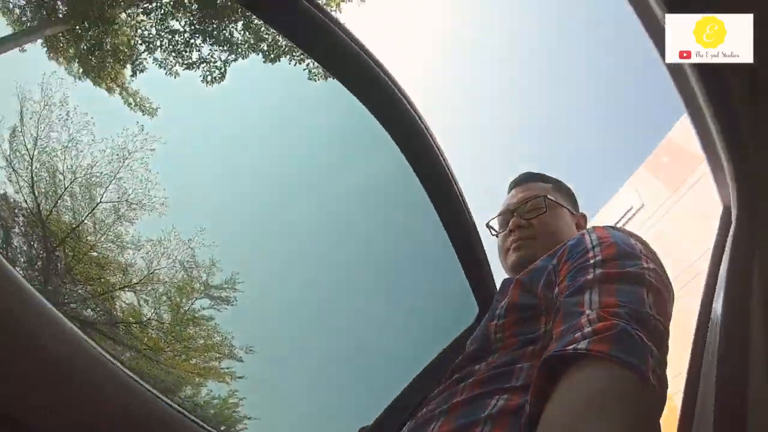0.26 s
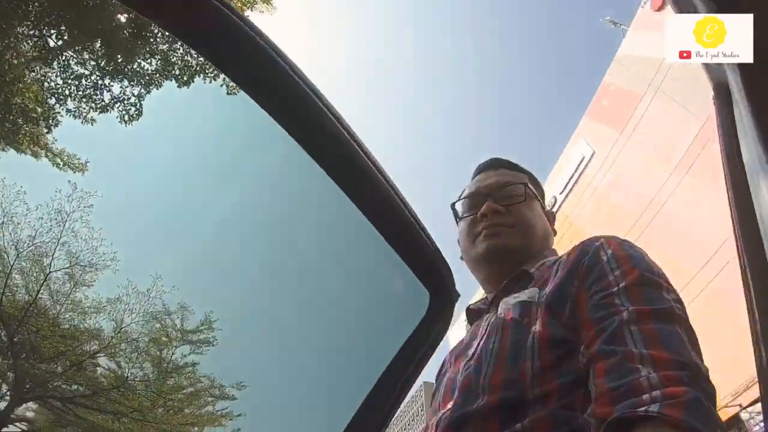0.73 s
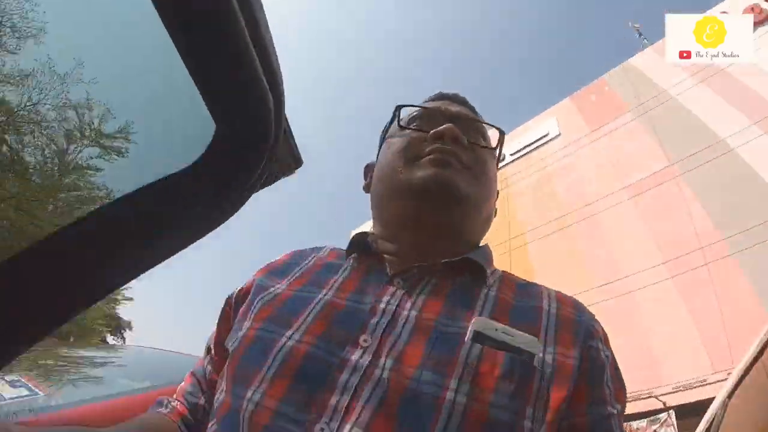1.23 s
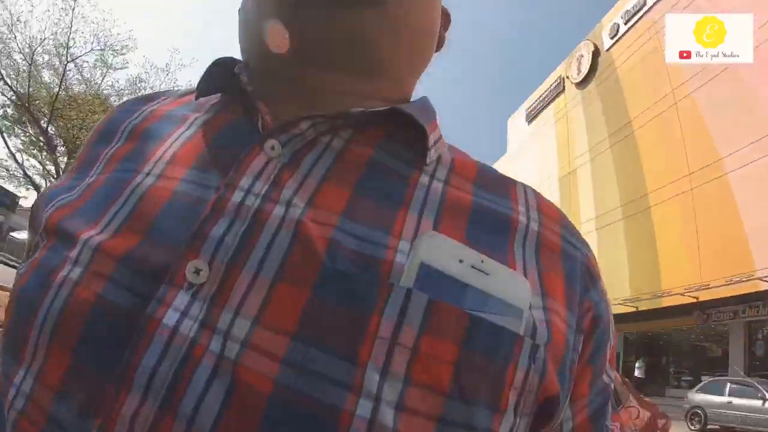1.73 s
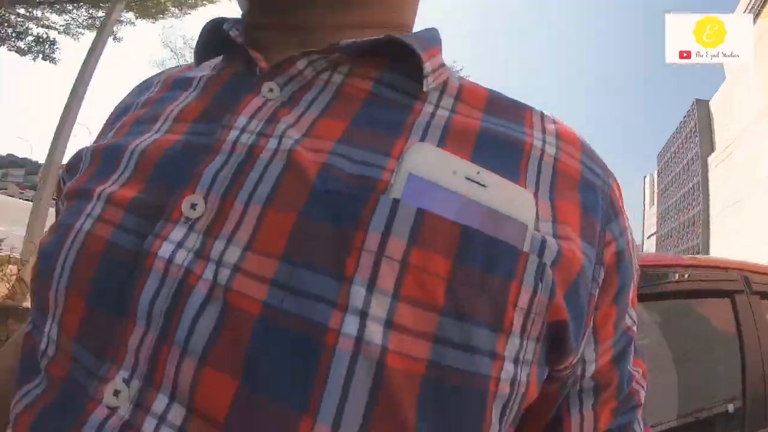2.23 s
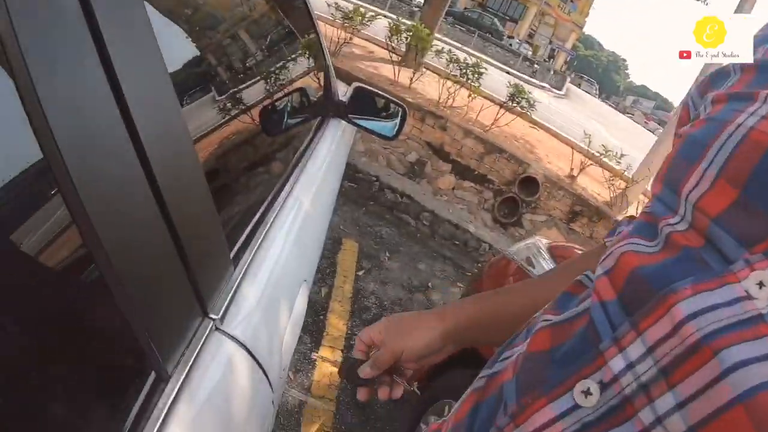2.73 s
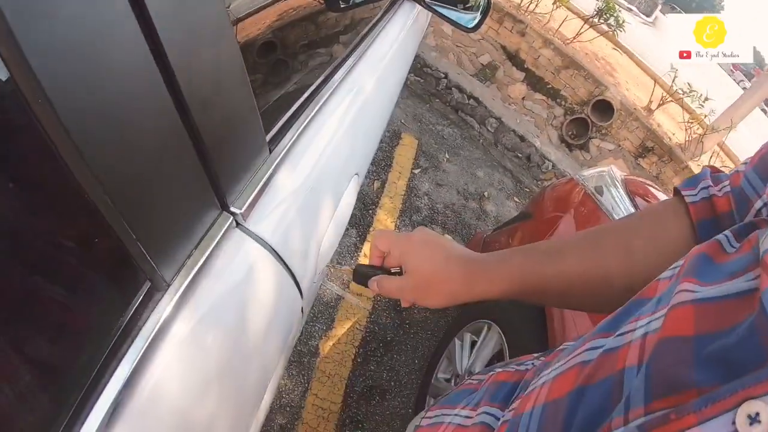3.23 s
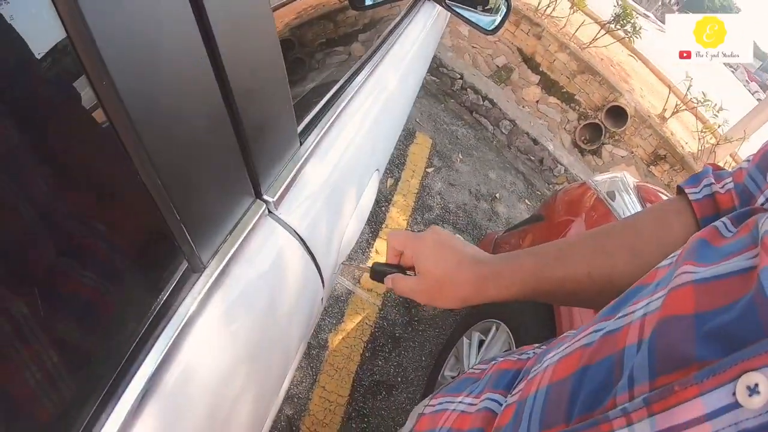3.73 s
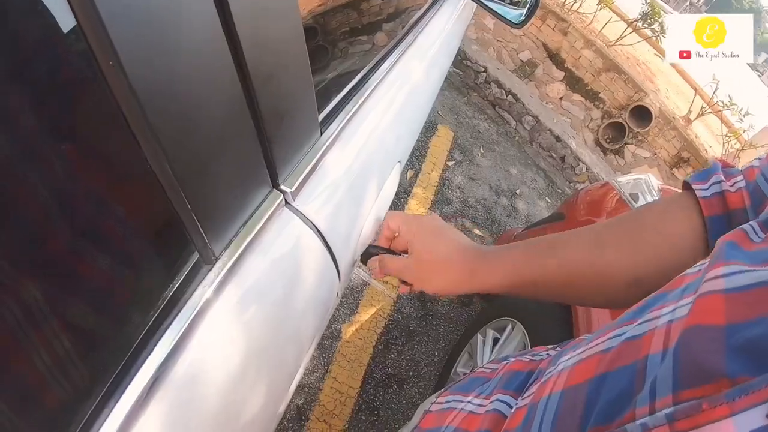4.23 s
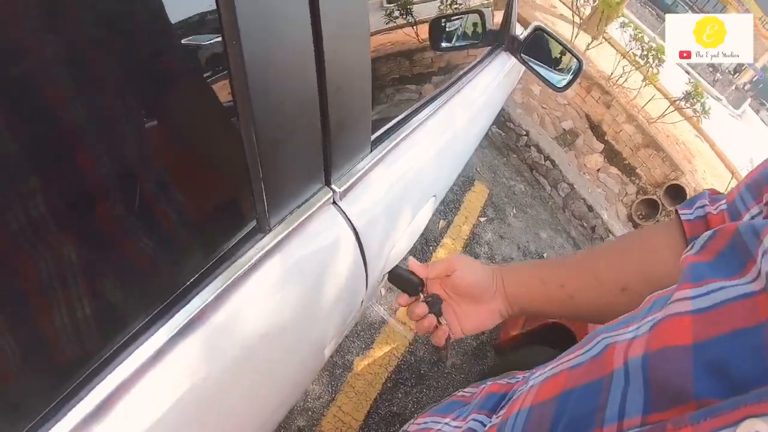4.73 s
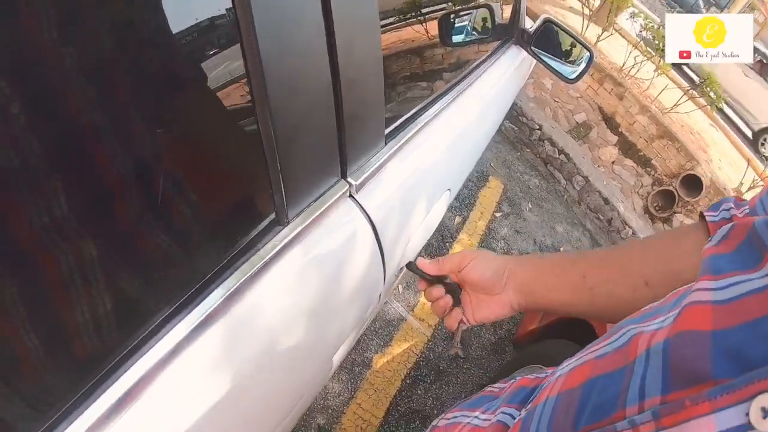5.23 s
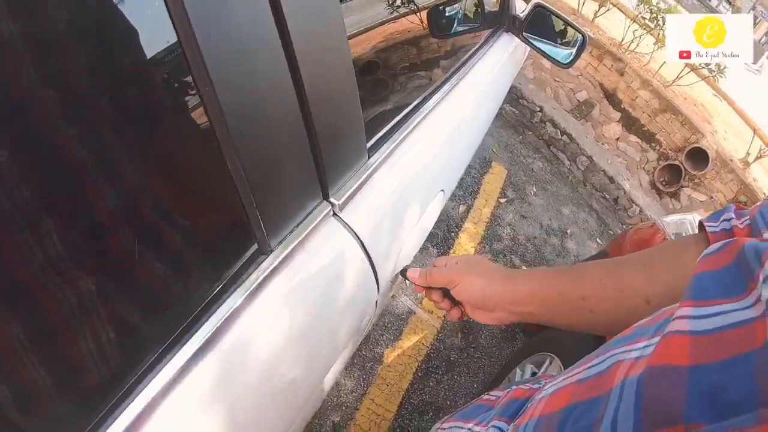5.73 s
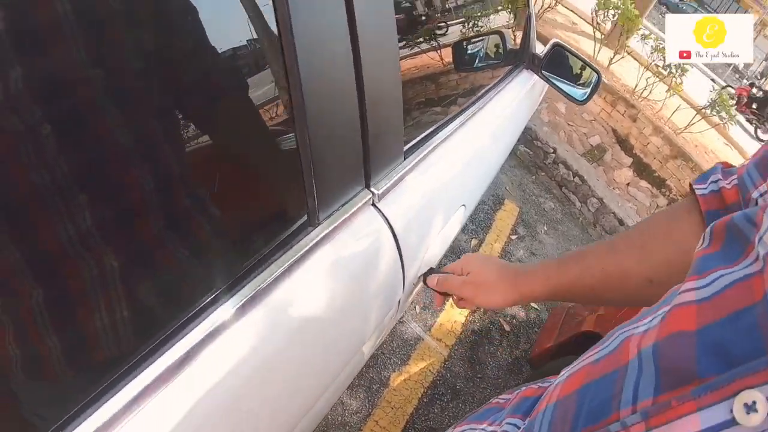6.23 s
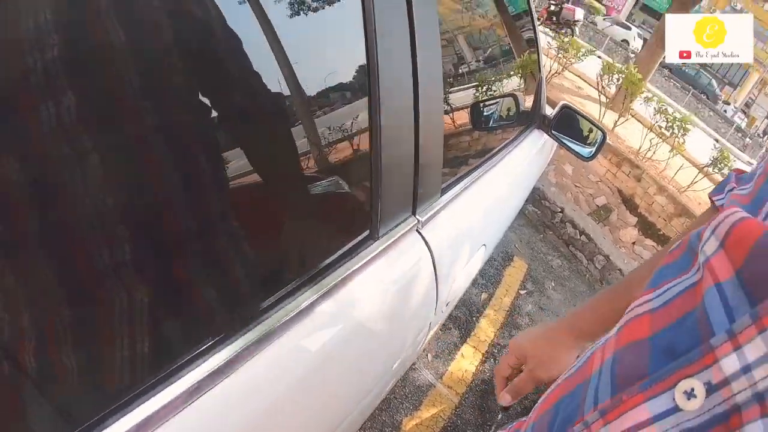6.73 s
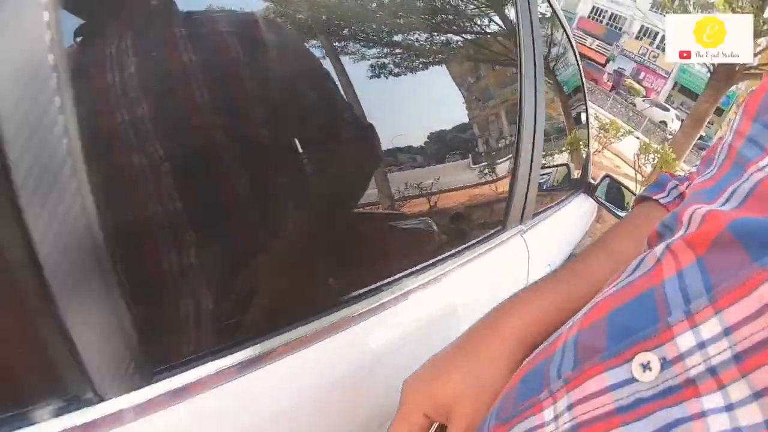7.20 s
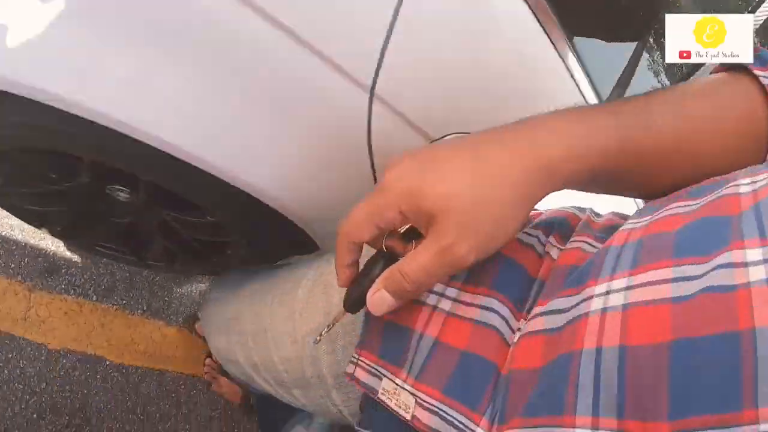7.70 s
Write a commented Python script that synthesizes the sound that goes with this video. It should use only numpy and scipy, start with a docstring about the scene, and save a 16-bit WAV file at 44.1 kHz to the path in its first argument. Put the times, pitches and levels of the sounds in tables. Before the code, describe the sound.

Cloth rustles and small knocks as a driver leaves a car, the door slams, a key scrapes and clicks, and a car and motorcycle pass.

```python
"""Car door, key and passing traffic

A driver slides out of a parked car: tilted noise swishes for the shirt, damped modes and noise taps for knocks.
The door slams in a run of blows, each ringing its skin, panel and shell; noise in a resonant barrel and ringing
modes make the key scrape into the lock and click. Shaped noise and wavering sines are traffic and an idling engine.
A vehicle passes, changes up and cruises on crank-order sines, exhaust thumps and tyre noise,
a motorcycle behind it thudding through its resonant pipe.
"""
import sys
import numpy as np
from scipy import signal
from scipy.fft import rfft, irfft, next_fast_len
from scipy.io import wavfile
from scipy.ndimage import uniform_filter1d, map_coordinates

SR = 44100
rng = np.random.default_rng(int(sys.argv[2]) if len(sys.argv) > 2 else 0)


def file_out(sig):
    """Save sig as 16-bit WAV at sys.argv[1]."""
    # one column per channel
    cols = np.atleast_2d(sig).T
    # limit, then scale
    lim = np.clip(cols, -1, 1)
    pcm = np.round(lim * 32767).astype(np.int16)
    wavfile.write(sys.argv[1], SR, pcm)


N = 350947

# spectrum of low tyre and traffic roar: (frequency [Hz], relative level [dB])
ROAR = [(120, -39.5), (230, 8), (380, 0), (600, -4.5), (850, -5), (1100, -9), (1500, -14.5), (2500, -26)]
# spectrum of deep rumble: (frequency [Hz], relative level [dB])
RUMBLE_TONE = [(15, -13.5), (28, -7), (45, 5), (70, -3), (110, 1), (150, -2.5), (200, -2.5), (270, -13.5),
               (400, -32.5)]
# spectrum of loose parts and dull body thuds: (frequency [Hz], relative level [dB])
CLATTER = [(100, -36), (250, -5), (600, 4), (1000, -5), (1350, -10), (1800, -10), (4000, -51)]
# blows of the door (seal, latch, striker, bottoming out, stop):
# (time [s], thump level [dB], skin level [dB], panel level [dB], clatter level [dB], latch level [dB])
BLOWS = [(2.1915, -16, -6.5, -39, -20, -46), (2.211, -19, -27, -27, -34, -34),
         (2.222, 3, -30, -12, -15, -21.5), (2.242, -13, -27, -23.5, -27, -34),
         (2.262, 0.5, -19.5, -22.5, -23, -40.5)]


def amp(db):
    """Decibels to linear gain."""
    return 10 ** (np.asarray(db) / 20)


def unit(x):
    """Scale to rms 1."""
    return x / np.sqrt(np.mean(x ** 2) + 1e-20)


def seconds():
    """The time of each sample."""
    return np.arange(N) / SR


def along(points, hz):
    """Interpolate (frequency [Hz], value) points on a log axis."""
    f, v = np.transpose(points)
    return np.interp(np.log(hz + 1), np.log(f + 1), v)


def colour(points, hz):
    """Gain of a spectrum, falling steeply beyond its ends."""
    inside = np.minimum(hz / points[0][0], 1) * np.minimum(points[-1][0] / (hz + 1), 1)
    return amp(along(points, hz)) * inside ** 4


def curves(rows):
    """One value per sample for each column after the time."""
    s, *cols = np.transpose(rows)
    return [np.interp(seconds(), s, c) for c in cols]


def wobble(rate):
    """A smooth random curve, rate knots a second."""
    knots = rng.standard_normal(int(N * rate / SR) + 4)
    return map_coordinates(knots, [np.arange(N) * rate / SR])


def swell(s, width):
    """A bell-shaped rise and fall around time s."""
    return np.exp(-((seconds() - s) / width) ** 2)


def phase(hz):
    """Radians turned at a changing frequency."""
    return 2 * np.pi * np.cumsum(hz) / SR


def filtered(x, response):
    """Apply a complex response of frequency to x."""
    n = x.shape[-1]
    m = next_fast_len(n + SR // 4)
    return irfft(rfft(x, m) * response(np.fft.rfftfreq(m, 1 / SR)), m)[..., :n]


def resonant(peaks, f):
    """Causal response of (frequency [Hz], width [Hz], level [dB]) resonances, alternating in sign."""
    total = 0
    for k, (centre, width, db) in enumerate(peaks):
        damping = 1j * f * width
        total = total + (-1) ** k * amp(db) * damping / (centre * centre - f * f + damping)
    return total


def noise(gain, size):
    """Stereo noise with its mid part at rms 1; the ears' likeness depends on frequency."""
    # (frequency [Hz], left-right likeness [0 to 1])
    alike = [(60, 0.98), (130, 0.93), (290, 1), (640, 0.74), (1400, 0.52), (3100, 0.94), (4500, 0.96),
             (7000, 0.37), (10000, .05)]

    def mid_side(hz):
        turn = np.arccos(np.clip(along(alike, hz), -1, 1)) / 2
        return gain(hz) * np.array([np.cos(turn), np.sin(turn)])

    mid, side = filtered(rng.standard_normal((2, size)), mid_side)
    return np.array([mid + side, mid - side]) / np.std(mid)


def rush(spectrum, size=N):
    """Noise with the given spectrum."""
    return noise(lambda hz: colour(spectrum, hz), size)


def tilt(db_per_octave, hz):
    """Brightness slope, pivoting near 3 kHz."""
    return amp(db_per_octave * np.log2((hz + 100) / 3000))


def dying(t60, attack):
    """Half a second of rise and exponential decay, both times in seconds."""
    t = np.arange(SR // 2) / SR
    return np.exp(-np.log(1000) * t / t60) * (1 - np.exp(-t / attack))


def burst(spectrum, t60, attack):
    """Many dense modes struck at once, heard as decaying noise."""
    return rush(spectrum, size=SR // 2) * dying(t60, attack)


def ring(modes, attack, scatter_db):
    """(frequency [Hz], t60 [s], level [dB]) modes, their levels scattered at each strike."""
    t = np.arange(SR // 2) / SR
    total = 0
    for hz, t60, db in modes:
        level = amp(db + scatter_db * rng.normal())
        total = total + level * np.sin(2 * np.pi * hz * t) * dying(t60, attack)
    return total


def add(out, s, sound):
    """Mix a sound in at time s."""
    part = out[:, round(s * SR):][:, :sound.shape[-1]]
    part += sound[..., :part.shape[1]]


def patchy(x):
    """Gain that drifts at random over a few hundred Hz and tens of milliseconds."""
    z = signal.stft(x, nperseg=512)[2]
    field = uniform_filter1d(rng.standard_normal(z.shape[1:]), size=3, axis=0)
    field = uniform_filter1d(field, size=7, axis=1)
    patch_db = 2 * unit(field)
    uneven = signal.istft(z * amp(patch_db), nperseg=512)[1][:, :N]
    return unit(uneven) * np.std(x)


def driver():
    """Cloth sticks and slips with a fine grain; elbows and hands knock the trim, which rings and chatters."""
    # spectrum of the shirt: (frequency [Hz], relative level [dB])
    cloth = [(530, -45), (900, -27), (1210, -10), (1800, -10.5), (2030, -6.5), (2450, -13), (2720, -10.5),
             (5450, -13.5), (8430, -19), (15000, -44.5)]
    # a swish for each move of the shirt over the seat:
    # (start [s], length [s], release [s], level [dB], brightness [dB per octave])
    swishes = [(0, 0.064, 0.061, -50.5, -2), (0.52, 0.028, 0.021, -50, -1), (0.9, 0.07, 0.085, -57, 8.5),
               (0.953, 0.092, 0.013, -54, 3), (1.249, 0.13, 0.15, -42.5, 0), (1.351, .02, .014, -40, 0.5),
               (1.597, 0.24, 0.046, -52.5, -1.5), (1.773, 0.31, .031, -52, -3.5),
               (2.415, 0.18, 0.04, -57, 4)]
    # small knocks of body and hand on the car: (time [s], tap level [dB], thud level [dB], ring level [dB])
    knocks = [(0.026, -29, -30.5, -60), (0.082, -25.5, -28, -50), (0.095, -31, -26, -54),
              (0.1381, -19.5, -33, -41), (0.3624, -27.5, -28, -53), (.91, -21.5, -43, -39),
              (1.2169, -28, -21.5, -45), (1.362, -23, -43, -42), (1.6408, -20, -32, -53),
              (1.695, -20, -37, -42), (2.1076, -20, -40, -50)]
    # spectrum of a tap on the trim: (frequency [Hz], relative level [dB])
    trim = [(600, -16), (1300, 3), (2100, -0.5), (3500, -6.5), (7500, -18.5), (11000, -30), (15000, -47)]
    # ringing of the trim: (frequency [Hz], t60 [s], level [dB])
    trim_modes = [(1510, .05, -4), (2030, .085, 0), (3850, .03, -9)]
    # the hollow behind the trim: (frequency [Hz], t60 [s], level [dB])
    hollow = [(205, .12, -2), (334, .12, -3), (694, .05, -9), (877, .025, -4)]
    # the body rocks as the driver's weight leaves the seat: (time [s], level [dB])
    bumps = [(0.135, -16), (0.288, -24), (0.345, -23.5), (0.603, -25), (1.217, -23)]

    out = np.zeros((2, N))
    t = np.arange(SR) / SR
    for s, length, release, db, tilt_db in swishes:
        rise = np.minimum(t / (0.55 * length), 1) ** 2
        stroke = rise * np.exp(-np.maximum(t - length, 0) / release)
        fabric = noise(lambda hz: colour(cloth, hz) * tilt(tilt_db, hz), size=SR)
        add(out, s, amp(db) * stroke * fabric)
    grain = unit(amp(2.4 * wobble(500) + 1.2 * wobble(80)))
    out = patchy(out) * grain

    for s, tap_db, thud_db, ring_db in knocks:
        add(out, s, amp(thud_db - 8) * ring(hollow, attack=.001, scatter_db=2))
        add(out, s, amp(ring_db) * ring(trim_modes, attack=0.00057, scatter_db=2))
        # loose trim chatters on, weaker at each contact
        for k in range(3):
            tap = amp(tap_db - 13) * burst(trim, t60=.028, attack=.0005)
            thud = amp(thud_db - 7) * burst(CLATTER, t60=.05, attack=.0014)
            gap_s = rng.uniform(.01089, .0143)
            add(out, s + k * gap_s, amp(-6.5 * k) * (tap + thud))

    for s, db in bumps:
        add(out, s, amp(db) * ring([(30.3, 0.16, 1), (80.5, 0.05, 7.1)], attack=0.002, scatter_db=0))
    return out


def car_park():
    """Traffic rumble and roar, street air and an idling engine's wavering hum."""
    # traffic further off builds up: (time [s], level [dB])
    traffic = [(0, -5.5), (1.8, -5), (2.7, -1.5), (3.2, 0.5), (5.3, 1), (6.2, -0.5), (7.96, -2.5)]
    # spectrum of the street air: (frequency [Hz], relative level [dB])
    street = [(150, -15), (250, -9), (400, 1), (600, -9), (900, -13), (1300, -9), (2200, -17), (3200, -18),
              (5000, -26), (6500, -32), (8200, -31.5), (10500, -48.5), (15000, -67.5)]
    # the idling engine's hum: (frequency [Hz], level [dB])
    idle = [(75.4, -37), (174, -44.5), (199, -40.5)]

    traffic_db, = curves(traffic)
    rumble = amp(-26.5 + traffic_db + 1.5 * wobble(6)) * rush(RUMBLE_TONE)
    # the roar swings wider in level than the rumble
    roar = amp(-35 + 2.46 * traffic_db + wobble(20)) * rush(ROAR)
    air = amp(-47.5 + .5 * wobble(3.3)) * rush(street)
    hum = np.zeros(N)
    for hz, db in idle:
        level = amp(db + 1.2 * wobble(12)) * np.sqrt(2)
        hum += level * np.sin(phase(hz + 1.564 * wobble(9)))
    return rumble + roar + air + hum


def swing():
    """Sleeve and door rush louder as they close in, pushing air ahead of them."""
    # spectrum of the rush: (frequency [Hz], relative level [dB])
    swing_tone = [(150, -39), (250, -8.5), (693, -15), (758, -20.5), (1190, -23.5), (1420, -27.5),
                  (4450, -38), (9000, -58), (11700, -66), (19800, -120)]
    half_strength_s, release_s = 0.2, 0.15  # time before the first blow at half strength; decay after it
    ahead = BLOWS[0][0] - seconds()
    approach = 1 / (1 + np.maximum(ahead, 0) / half_strength_s)
    closing = approach * np.exp(np.minimum(ahead, 0) / release_s)
    air_rush = closing * amp(-31.5 + wobble(39.5)) * rush(swing_tone)
    pushed_air = closing ** 2 * amp(-20.5) * rush(RUMBLE_TONE)
    return air_rush + pushed_air


def nearness():
    """Closest distance of the passing vehicle over its present distance."""
    closest_s, width_s = 6.73, 0.53  # moment of closest approach; closest distance over speed
    return 1 / np.hypot(1, (seconds() - closest_s) / width_s)


def hidden_db():
    """Loss as the parked cars come between vehicle and microphone: 7 dB per second from 7.6 s."""
    return -7 * np.maximum(seconds() - 7.6, 0)


def delayed(x, metres):
    """Stereo sound after a longer, changing path, at 343 m/s."""
    n = np.arange(N)
    return np.array([np.interp(n - metres / 343 * SR, n, ear) for ear in x])


def tyres():
    """Roar, tread and hiss swell with nearness, the hiss most; bounces off road and car sweep combs through."""
    # spectra of the tread's rush and the hiss: (frequency [Hz], relative level [dB])
    tread_tone = [(800, -19.5), (1400, 2.5), (2200, -2), (3200, -1.5), (4400, -7), (6000, -13.5)]
    hiss_tone = [(3000, -13.5), (4700, -4.5), (6500, -4), (8000, -3), (9500, -12), (12000, -24),
                 (14000, -24), (15500, -36)]
    # path by way of a neighbouring car's flank: (time [s], extra path [m], share reflected [0 to 1])
    bounce = [(4, .386, .1), (5.6, .267, .12), (5.85, .245, .4), (6.2, .196, .4), (6.35, .152, .4),
              (6.5, .118, .3), (6.8, .1, .05)]
    near, hidden = nearness(), hidden_db()

    def band(spectrum, db, falloff, hidden_share):
        """Fluttering noise falling with a power of distance and losing part of its level when hidden."""
        flutter = amp(.7 * wobble(14) + 1.5 * wobble(90))
        return amp(db + hidden_share * hidden) * near ** falloff * flutter * patchy(rush(spectrum))

    roar = band(ROAR, db=-36, falloff=0.78, hidden_share=1)
    tread = band(tread_tone, db=-38.5, falloff=0.78, hidden_share=0.036)
    hiss = band(hiss_tone, db=-42, falloff=1.49, hidden_share=0.9)
    # the path by way of the asphalt is 0.57 m longer when nearest
    off_road = .5 * delayed(roar, .57 * near)
    extra_m, share = curves(bounce)
    off_car = share * delayed(tread + hiss / 2, extra_m)
    arrives, = curves([(1.8, 0.036), (3.1, 0.89)])
    return arrives * (roar + tread + hiss + off_road + off_car)


def thumps(beat_hz, pipe):
    """Exhaust beats of uneven strength ring a silencer, which passes only the low thump."""
    beats = np.diff(np.floor(np.cumsum(beat_hz) / SR), prepend=0)
    beats = beats * amp(0.83 * wobble(25))
    return unit(filtered(beats, lambda hz: resonant(pipe, hz) / (1 + 1j * hz / 350) ** 3))


def engine():
    """Four cylinders fire twice a turn; one beats harder and thumps the silencer every second turn."""
    # the engine pulls, changes up and cruises: (time [s], crank speed [turns per second])
    revs = [(2.9, 40.5), (3.3, 43), (3.6, 47), (3.9, 50.7), (4.15, 53), (4.45, 56.5), (5, 62.5),
            (5.5, 66.8), (6.03, 70.2), (6.15, 66.5), (6.63, 50), (6.85, 50.2), (7.4, 51.7), (7.96, 51.8)]
    # its firing note: (time [s], level [dB])
    exhaust = [(2.7, -48), (3.3, -27.5), (3.9, -21.5), (4.3, -25), (4.52, -21), (5.4, -19.5), (5.68, -16),
               (6.02, -17.5), (6.17, -33), (6.4, -25.5), (6.65, -23.5), (6.82, -33), (7.15, -31),
               (7.96, -36)]
    # the firing note fades briefly: (time [s], depth [dB])
    fades = [(3.45, 6), (3.77, 7), (4.02, 13), (4.27, 9), (4.38, 11), (4.69, 8), (5.24, 5), (5.79, 8)]
    # third and fourth orders and the growl above: (time [s], third level [dB], fourth level [dB], growl level [dB])
    overtones = [(2.9, -44, -46, -50), (3.42, -33, -38, -39), (3.62, -39, -33, -39), (3.85, -28, -38, -39),
                 (4.15, -28, -35, -40), (4.38, -40, -30, -41), (4.95, -31, -31.5, -40),
                 (5.55, -33, -33, -38), (5.95, -30.5, -26, -33.5), (6.2, -38, -31, -34),
                 (6.53, -37, -31, -27), (6.76, -38, -27, -30), (6.98, -39, -37, -30.5),
                 (7.5, -43, -38, -33.5), (7.96, -46, -39, -47)]
    # upper orders: (frequency [Hz], level [dB])
    rasp = [(200, -7), (340, -3.5), (440, -10), (570, -8.5), (720, -15), (850, -18), (1200, -20),
            (1700, -25.5), (2500, -28), (3000, -31.5)]
    # one strong beat in each engine cycle, loudest under light load: (time [s], level [dB])
    lope = [(2.85, -50), (3.2, -23.5), (3.7, -31), (5, -40), (6.85, -45)]
    # silencer resonances: (frequency [Hz], width [Hz], level [dB])
    silencer = [(54, 20, -9), (100, 48, 0), (235, 50, -17)]

    crank_hz, = curves(revs)
    exhaust_db, = curves(exhaust)
    third_db, fourth_db, growl_db = curves(overtones)
    fade_db = sum(db * swell(s, width=0.052) for s, db in fades)
    angle = phase(crank_hz * (1 + 0.003 * wobble(25) + .006 * wobble(120)))

    def order(k, rough_db):
        """A sine at k times the crank speed, uneven in level."""
        return np.sqrt(2) * np.sin(k * angle + rng.uniform(0, 2 * np.pi)) * amp(rough_db * wobble(11))

    low = amp(exhaust_db - fade_db) * order(2, rough_db=1)
    low += amp(third_db - fade_db / 2) * order(3, rough_db=1.8)
    low += amp(fourth_db) * order(4, rough_db=2.5)
    upper = np.zeros(N)
    for k in range(5, 50):
        # odd orders lie 3 dB under the even ones; the gain steps every 64 samples
        gain = amp(along(rasp, k * crank_hz[::64]) - 3 * (k % 2))
        upper += gain.repeat(64)[:N] * order(k, rough_db=3)
    # gas leaves the pipe in chuffs, once a turn
    chuffs = rush(ROAR) * unit((1 + np.cos(angle)) ** 2)
    growl = amp(growl_db) * (.9 * upper + .5 * chuffs)
    strong_beat = thumps(crank_hz / 2, silencer) * amp(curves(lope)[0])
    arrives, = curves([(2.4, 0.075), (3.2, 0.94)])
    return arrives * (low + growl + strong_beat)


def reflection_nulls(x):
    """Reflections cancel bands of the passing vehicle's sound, sliding as it passes."""
    # one track for each band: (time [s], centre [Hz], width [Hz], depth [dB])
    nulls = [
        [(5.9, 1620, 90, 0), (6.2, 1620, 110, 7), (6.38, 1600, 190, 10), (6.52, 1850, 160, 8),
         (6.8, 1970, 130, 8), (7.96, 2050, 120, 2)],
        [(6.4, 3000, 300, 0), (6.65, 3000, 350, 4), (7.2, 2830, 150, 2.5)],
        [(6.9, 860, 120, 0), (7.4, 900, 130, 5), (7.7, 900, 170, 12)],
    ]
    hz, t, z = signal.stft(x, SR, nperseg=1024)
    for track in nulls:
        s, *cols = np.transpose(track)
        centre, width, depth_db = [np.interp(t, s, c) for c in cols]
        z = z * amp(-depth_db * np.exp(-((hz[:, None] - centre) / width) ** 2))
    return signal.istft(z, SR, nperseg=1024)[1][:, :N]


def blow(thump_db, skin_db, panel_db, clatter_db, latch_db):
    """One contact rings the door's skin and panel, rattles its insides and latch, then moves the shell."""
    # the outer skin, slapped by the seal; the inner panel; the door's low modes:
    # (frequency [Hz], t60 [s], level [dB])
    skin_modes = [(416, 0.16, -7), (560, 0.1, 1), (737, 0.095, -11.5), (990, 0.025, 1), (1310, 0.03, -10)]
    panel_modes = [(288, 0.51, -4), (359, 0.23, -5), (473, 0.13, -2), (593, 0.19, -11), (928, 0.14, -5.5),
                   (1060, 0.19, -11), (1182, 0.11, -8.5), (1212, 0.061, -10)]
    shell_modes = [(55.4, 0.21, -15), (94, 0.1, -3.5), (123, 0.089, -7.5), (242.5, 0.2, -10),
                   (332, 0.14, -9.5)]
    # spectrum of the latch: (frequency [Hz], relative level [dB])
    latch_tone = [(820, 2.5), (1400, -19), (1780, -5), (2490, -11), (2950, -9), (3670, -9), (4090, -12),
                  (5840, -18), (6080, -20), (8610, -23.5), (15000, -49)]

    skin = amp(skin_db - 3) * ring(skin_modes, attack=.002, scatter_db=1)
    panel = amp(panel_db - 3) * ring(panel_modes, attack=.001, scatter_db=1)
    rattle = amp(clatter_db) * burst(CLATTER, t60=0.11, attack=0.00053)
    rattle += amp(latch_db) * burst(latch_tone, t60=0.18, attack=0.0027)
    # the door is close, so both ears hear nearly the same
    out = skin + panel + .5 * (rattle.mean(axis=0) + rattle)
    # the heavy shell moves 3.77 ms after the contact
    add(out, 0.00377, amp(thump_db - 6) * ring(shell_modes, attack=.0015, scatter_db=1))
    return out


def door():
    """The seal slaps the panel, the latch catches, the door bottoms out and rocks to rest."""
    out = np.zeros((2, N))
    # the rubber touches 8.1 ms before the first blow
    add(out, BLOWS[0][0] - 0.0081, amp(-24.5) * burst(CLATTER, t60=0.12, attack=0.0033))
    for s, *levels_db in BLOWS:
        add(out, s, blow(*levels_db))

    # the door rocks on its seal every 35 ms, 2 dB weaker each time, and the latch chatters along
    last_s, *body_db, _ = BLOWS[-1]
    rebound_db = np.append(np.add(body_db, -11.5), -40.5)
    for k in range(3):
        add(out, last_s + (k + 1) * .035, blow(*(rebound_db - 2 * k)))

    # the trapped air makes the whole cabin heave
    add(out, 2.236, amp(-9.5) * ring([(32.8, 0.43, 0)], attack=0.031, scatter_db=2))
    return out


def key():
    """Steel scrapes and snaps in the lock barrel; the bolt shoots over, the spring returns; the ring tinkles."""
    # the key in the lock: (time [s], level [dB], t60 [s], brightness [dB per octave])
    lock = [(3.212, -28.5, .03, -1.5), (3.41, -20.5, .02, -5), (3.9708, -24, .012, 3),
            (4.124, -36, .22, 3.5), (4.184, -30, .041, 5), (4.2055, -7.5, .02, -2), (5.28, -20, .07, -4),
            (5.295, -29, .021, 16), (5.5793, -22.5, .092, -6.5), (5.6535, -15.5, .04, 1),
            (5.6585, -18.5, .04, -1), (5.7025, -12.5, .033, 0), (5.7095, -17.5, .04, -1.5),
            (6.2468, -20.5, .035, -5), (6.556, -17, .02, -3)]
    # resonances of the lock barrel: (frequency [Hz], width [Hz], level [dB])
    barrel = [(690, 50, 8.5), (1320, 210, 2.5), (2150, 720, -2), (3510, 600, -1), (3820, 380, 1.5),
              (4760, 730, -4), (5560, 370, -4), (7280, 850, -8.5)]
    # the lock's bolt and its return spring: (frequency [Hz], t60 [s], level [dB])
    bolt = [(2020, .045, -5), (2480, .022, 3), (3450, .035, -9), (4030, .04, -6)]
    spring = [(1650, .025, -3), (3290, .06, -3), (4080, .035, -1), (5700, .03, -6), (6060, .03, -6)]
    # ticks of the key ring: (time [s], level [dB])
    jingle = [(4.399, -37.5), (4.409, -28.5), (4.46, -42), (4.6329, -45)]
    # ringing of the keys: (frequency [Hz], t60 [s], level [dB])
    key_modes = [(9360, 0.076, -4), (10300, 0.037, -23), (12270, .06, -16), (14200, .035, -5),
                 (14840, .04, -15)]

    out = np.zeros((2, N))
    for s, db, t60, tilt_db in lock:
        steel = noise(lambda hz: resonant(barrel, hz) * tilt(tilt_db, hz), size=SR // 2)
        add(out, s, amp(db - 6.5) * steel * dying(t60, attack=.0004))
        # the door's skin answers each snap
        add(out, s, amp(db - 20) * burst(CLATTER, t60=0.052, attack=.001))

    # the key turns over and springs back
    add(out, 5.6522, amp(-24) * ring(bolt, attack=.0006, scatter_db=2))
    add(out, 5.7025, amp(-26.5) * ring(spring, attack=.0006, scatter_db=2))

    for s, db in jingle:
        tick = burst([(5000, -6), (9500, 0), (14500, -3)], t60=.03, attack=.0006)
        tinkle = ring(key_modes, attack=.0005, scatter_db=2)
        add(out, s, amp(db - 12.5) * tick + amp(db - 16.5) * tinkle)
    return out


def passing_swells():
    """Unsteady tones of the passing vehicle swell and fade; the more their pitch scatters, the more they hiss."""
    # the engine's fifth order (355 Hz), growl bands (850 and 1230 Hz) and whines that swell and fade:
    # (time [s], half width [s], pitch [Hz], glide [Hz per s], pitch scatter [Hz], level [dB])
    swells = [(5.43, .13, 850, 100, 130, -38), (5.7, .12, 2880, 150, 24, -46.5),
              (5.88, .12, 1230, 0, 80, -40.5), (5.9, .14, 355, 60, 14, -33),
              (5.98, .13, 2942, 30, 28, -42.5), (6.08, .25, 1785, 100, 50, -45),
              (6.78, .12, 1550, 40, 30, -42), (6.82, .05, 5820, 0, 200, -44),
              (6.88, .18, 4170, 0, 170, -49), (7.2, .34, 1735, -100, 75, -44.5),
              (7.1, .26, 2270, 500, 150, -45), (7.64, .19, 2460, 450, 70, -50)]
    out = np.zeros(N)
    for s, width, hz, glide, scatter_hz, db in swells:
        pitch = hz + glide * (seconds() - s) + scatter_hz * wobble(400)
        flutter_db = 2 * wobble(90)
        out += swell(s, width) * amp(db + flutter_db) * np.sqrt(2) * np.sin(phase(pitch))
    return out


def motorcycle():
    """Under load its pipe hums on the fifth multiple of the beat; easing off, it breaks into thuds."""
    # (time [s], beat rate [Hz], thud level [dB], hum level [dB])
    follower = [(6.2, 22.5, -50, -50), (6.9, 23.8, -37, -32), (7.2, 25.1, -30, -30),
                (7.42, 25.7, -27, -25.5), (7.6, 25, -25.5, -29), (7.73, 23.4, -21.5, -38),
                (7.96, 22.6, -22, -45)]
    # pipe resonances: (frequency [Hz], width [Hz], level [dB])
    pipe = [(58, 22, -4.5), (108, 42, 0), (235, 50, -19)]
    beat_hz, thud_db, hum_db = curves(follower)
    hum_phase = 5 * phase(beat_hz + .25 * wobble(20))
    hum = amp(hum_db + 2 * wobble(14)) * np.sqrt(2) * np.sin(hum_phase)
    thuds = amp(thud_db) * thumps(beat_hz * (1 + .03 * wobble(30)), pipe)
    return hum + thuds


def yard(x):
    """The neighbouring cars and walls answer with a tail of noise, each frequency dying at its own rate."""
    # echoes between the cars: (frequency [Hz], t60 [s])
    echo_t60 = [(100, .45), (1000, 0.24), (4000, 0.33), (12000, 0.091)]
    hz, t, z = signal.stft(rng.standard_normal((2, SR // 2)), SR, nperseg=256)
    decay = np.exp(-np.log(1000) * t / along(echo_t60, hz)[:, None])
    tail = signal.istft(z * decay, SR, nperseg=256)[1]
    return signal.fftconvolve(x, tail / np.linalg.norm(tail[0]), axes=1)[:, :N]


def scene():
    """The door, key and driver close by, the car park and the road around them."""
    near = driver() + swing() + door() + key()
    echo = amp(-24) * yard(near)
    passing = reflection_nulls(tyres() + engine())
    return near + echo + car_park() + passing + passing_swells() + motorcycle()


def record(dry):
    """The stereo width varies; the microphone sheds the deepest bass, dulls the top and stops at a band limit."""
    # the image closes to mono and opens again: (time [s], side level [dB])
    width_rows = [(.45, -38), (.85, -4.5), (1.75, 5), (2.2, -34.5), (2.35, -73), (3.7, -55), (4.25, -12),
                  (4.7, -0.5), (7.96, 5)]
    # microphone response: (frequency [Hz], level [dB])
    microphone = [(9000, -0.5), (11500, 1.5), (15000, -5.5)]
    top_hz, edge_s = 15655, .006  # band limit; fade in and out

    mid = dry.mean(axis=0)
    pair = mid + amp(curves(width_rows)[0]) * (dry - mid)

    def response(hz):
        no_drift = 1j * hz / (12 + 1j * hz)
        return no_drift * amp(along(microphone, hz)) * (hz < top_hz)

    # mirrored ends keep the filter from ringing at the edges
    padded = np.pad(pair, ((0, 0), (SR, SR)), mode="reflect", reflect_type="odd")
    edges = np.minimum(np.minimum(seconds(), seconds()[::-1]) / edge_s, 1)
    return edges * filtered(padded, response)[:, SR:-SR]


dry = scene()
out = record(dry)
file_out(out)
```